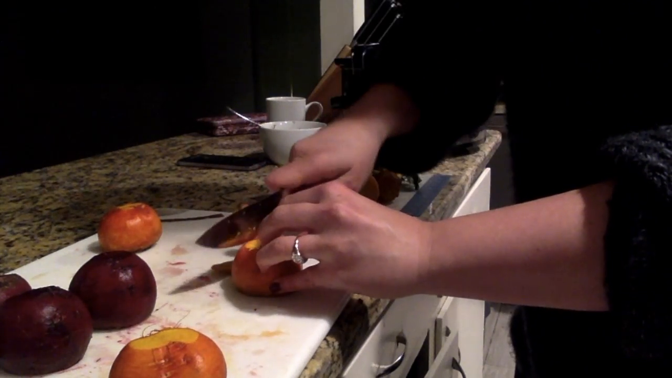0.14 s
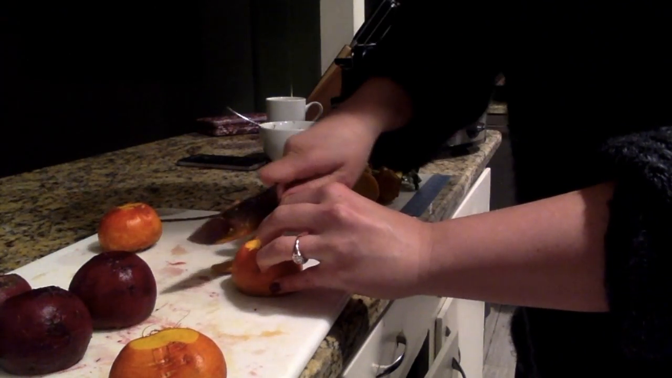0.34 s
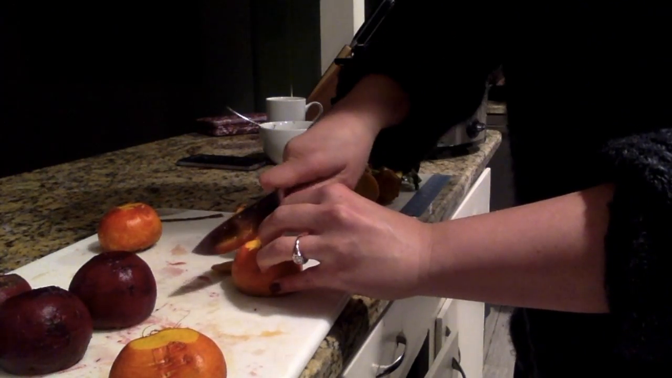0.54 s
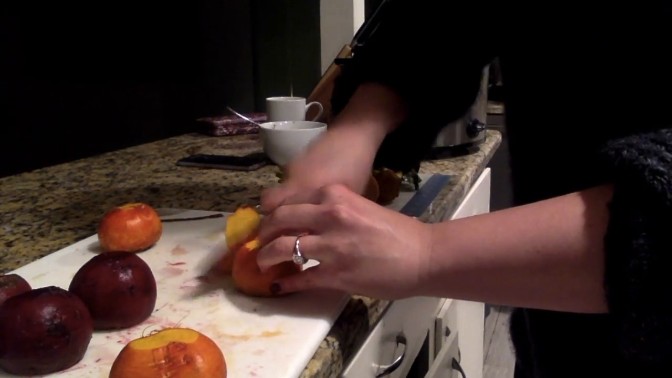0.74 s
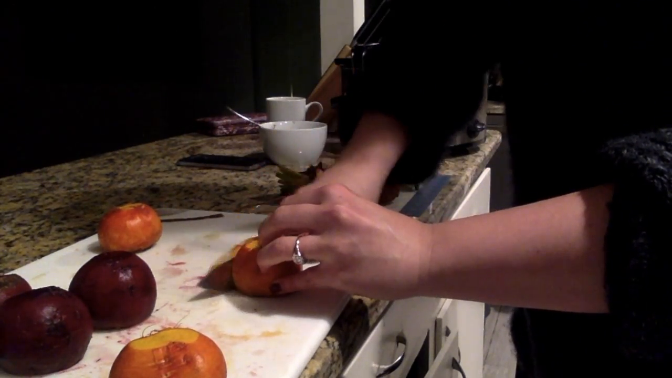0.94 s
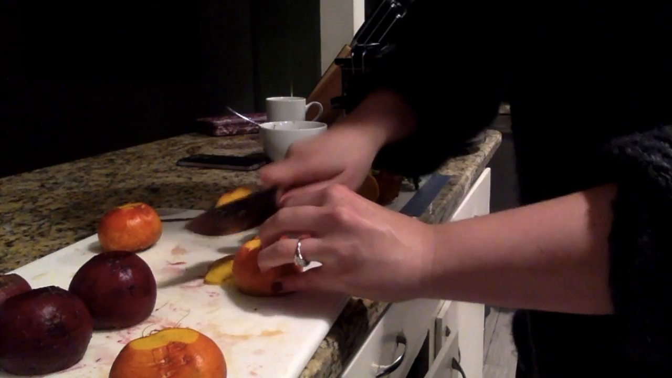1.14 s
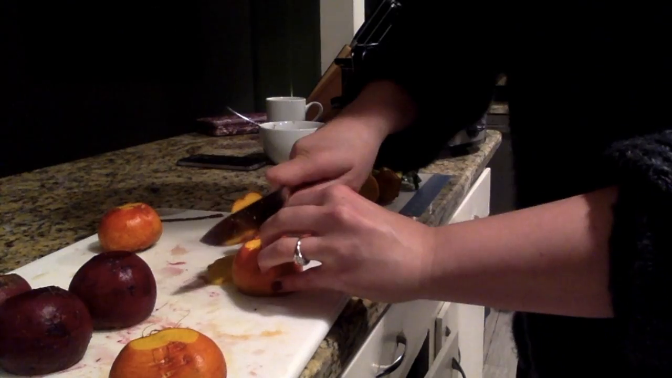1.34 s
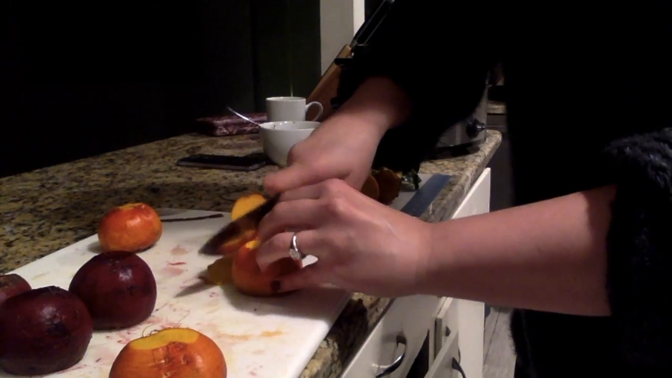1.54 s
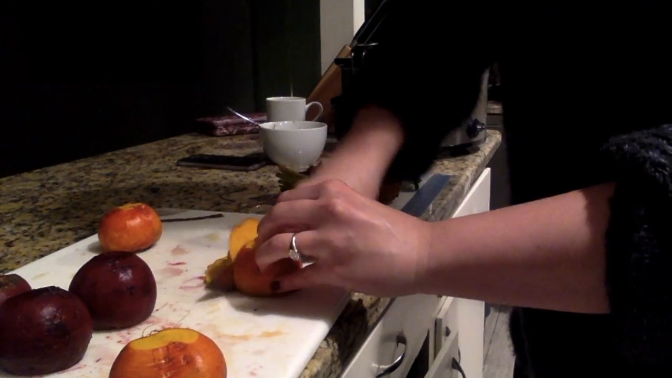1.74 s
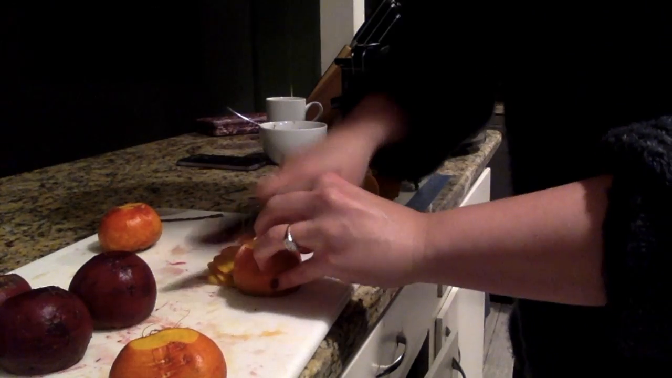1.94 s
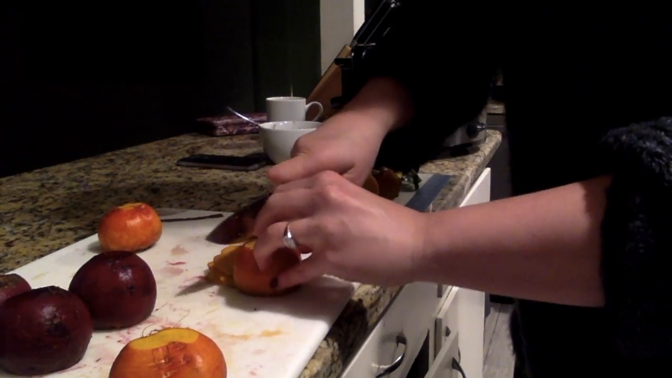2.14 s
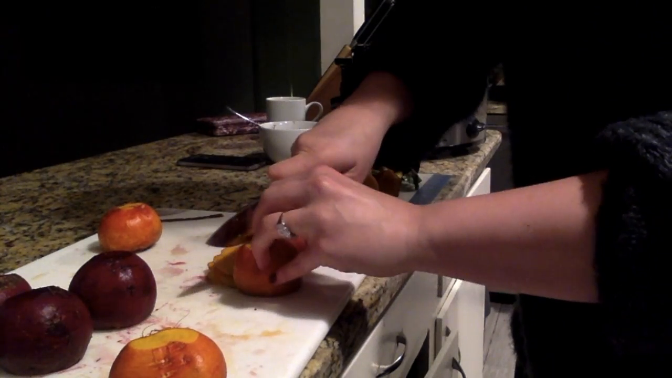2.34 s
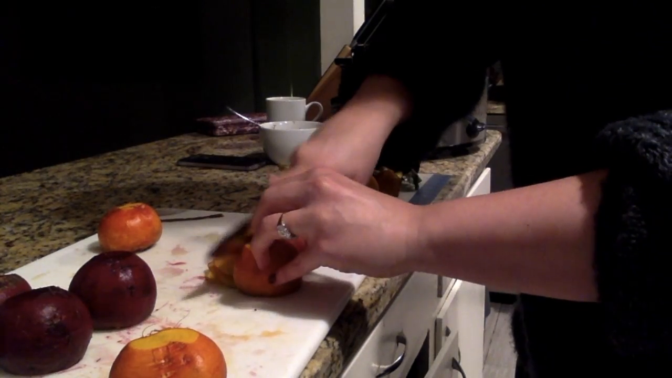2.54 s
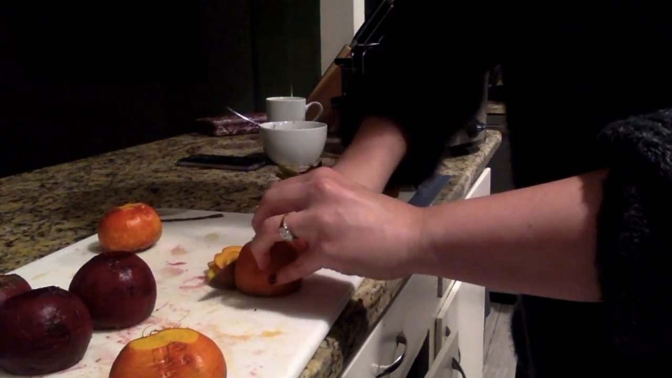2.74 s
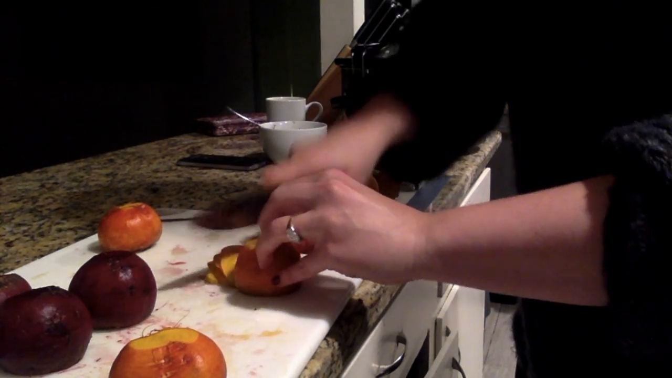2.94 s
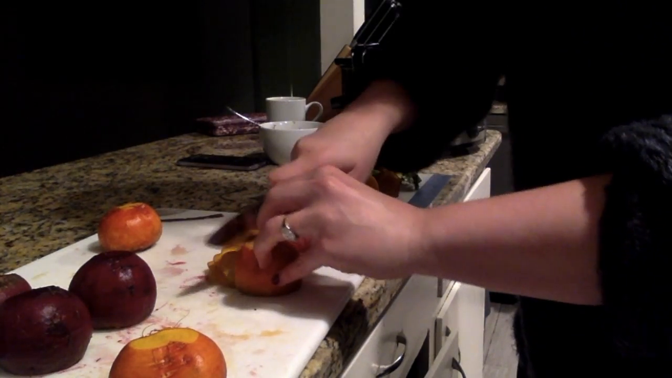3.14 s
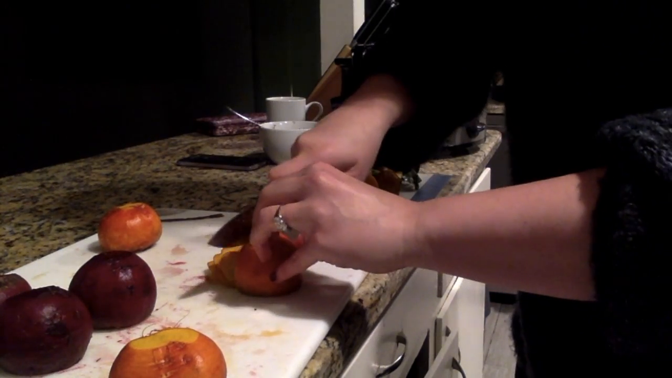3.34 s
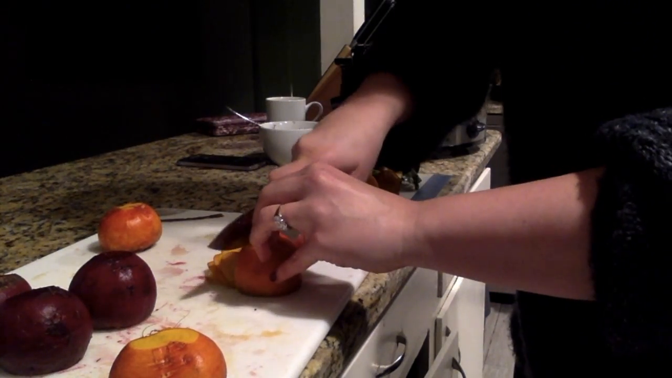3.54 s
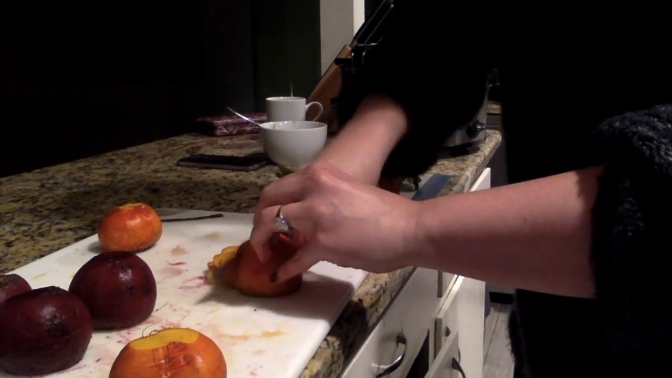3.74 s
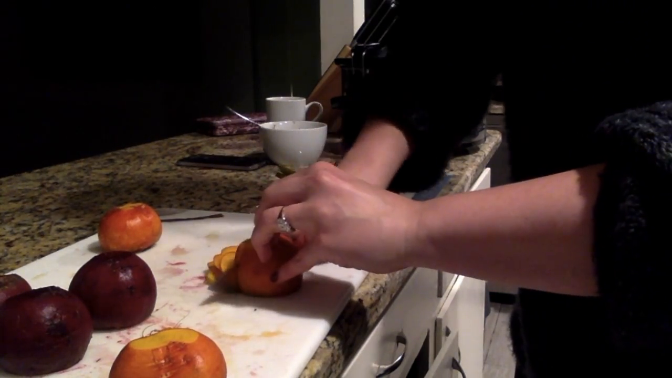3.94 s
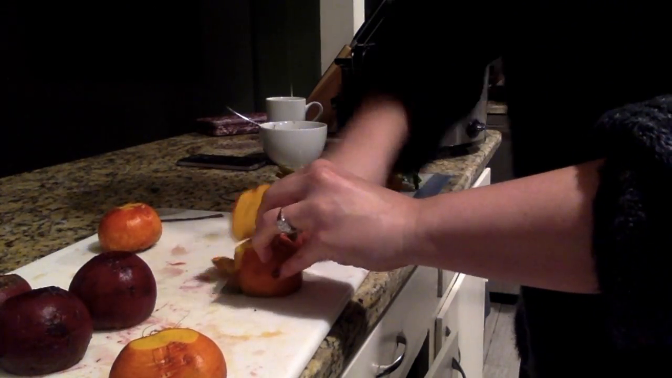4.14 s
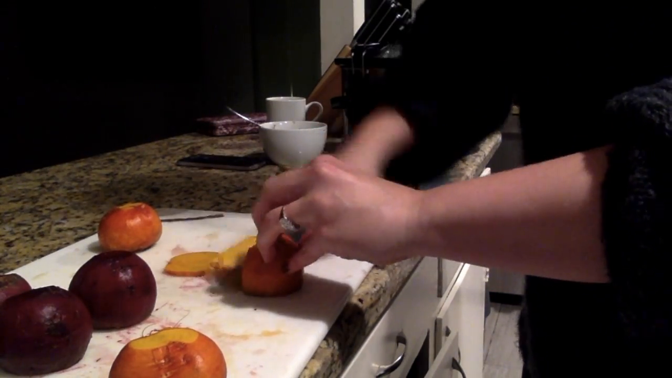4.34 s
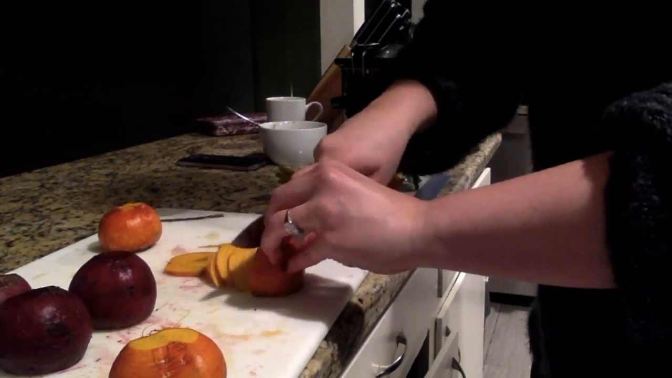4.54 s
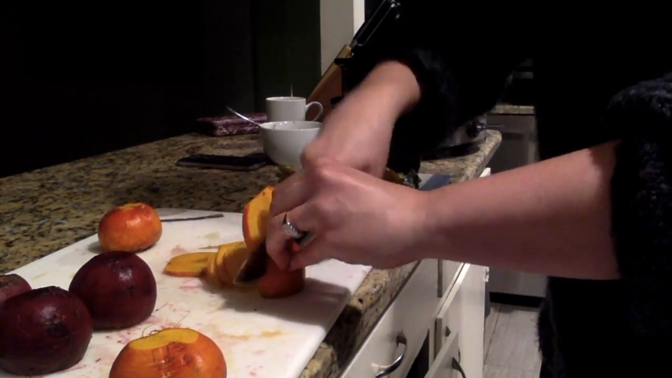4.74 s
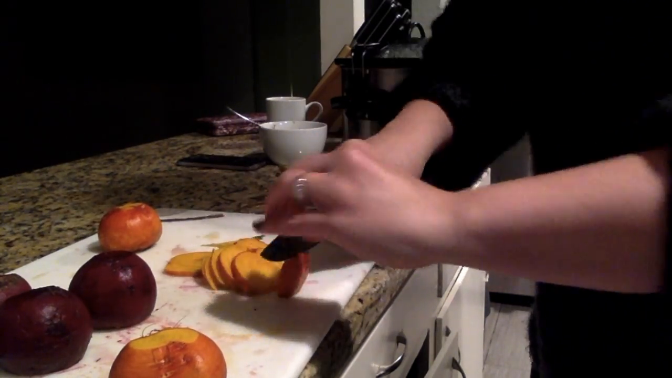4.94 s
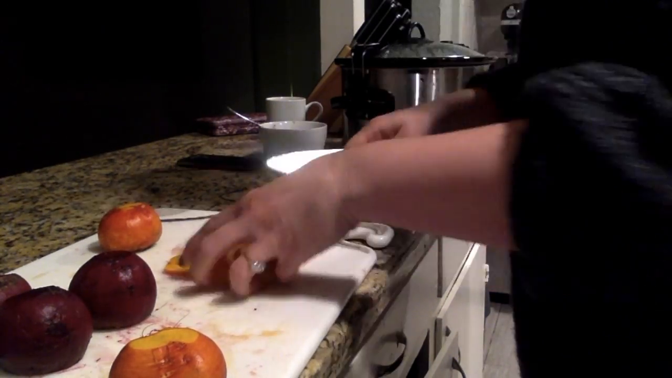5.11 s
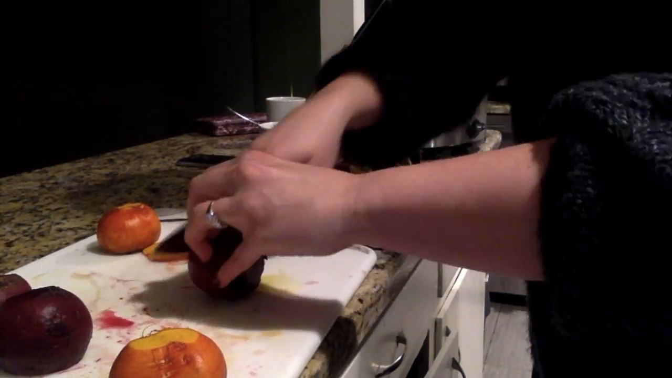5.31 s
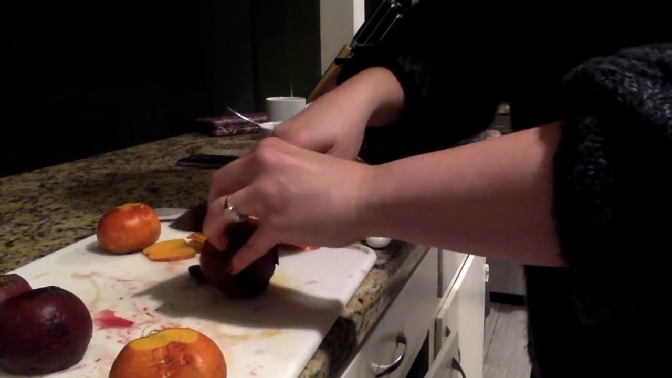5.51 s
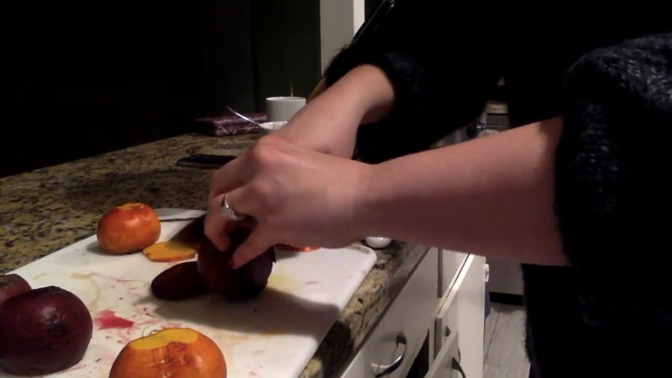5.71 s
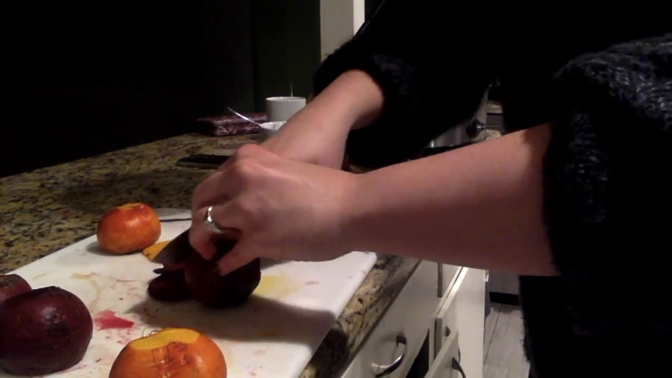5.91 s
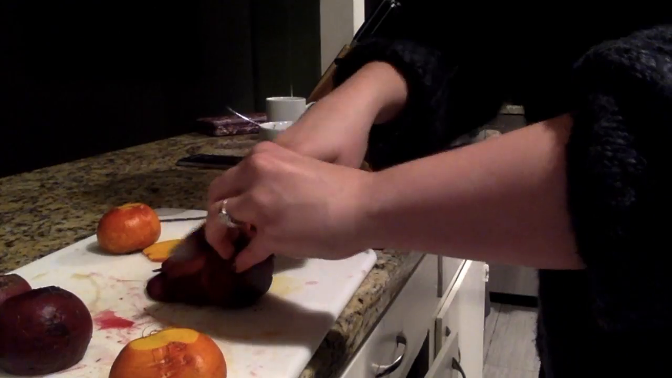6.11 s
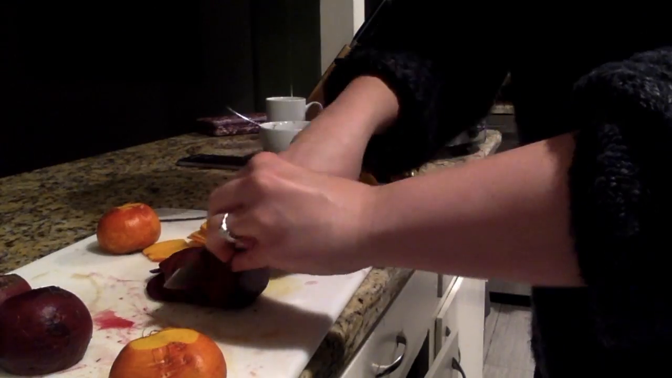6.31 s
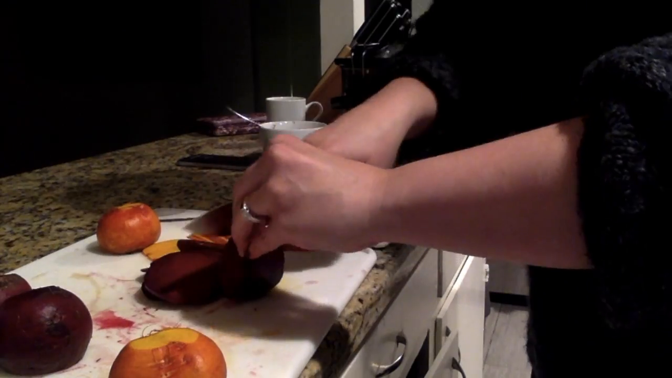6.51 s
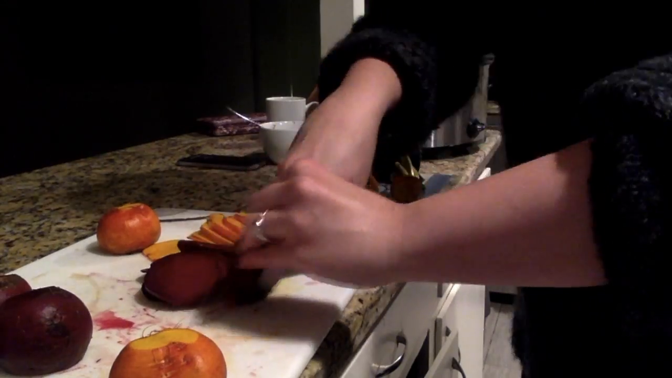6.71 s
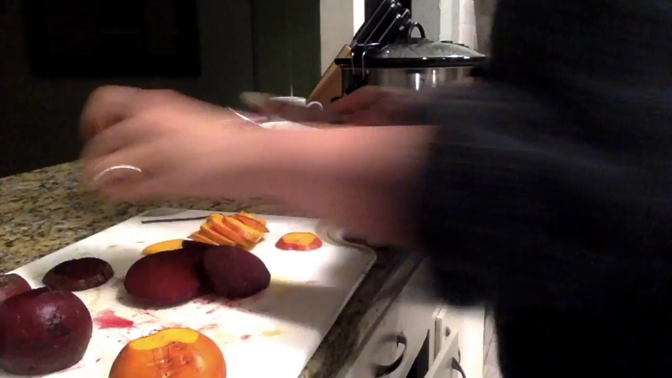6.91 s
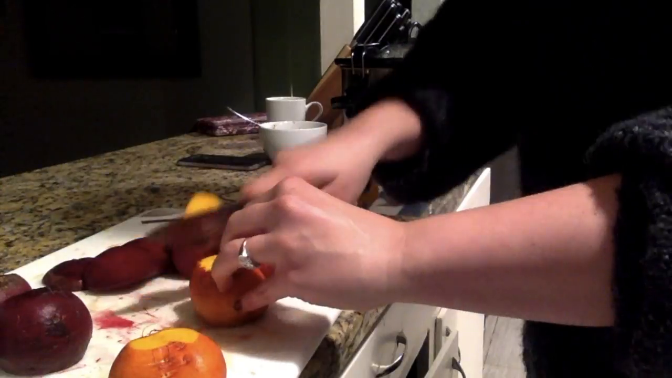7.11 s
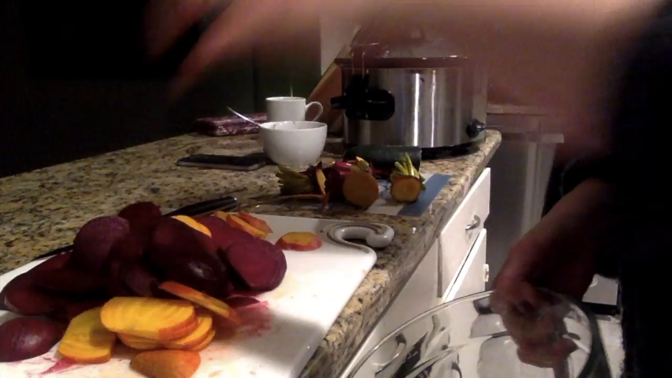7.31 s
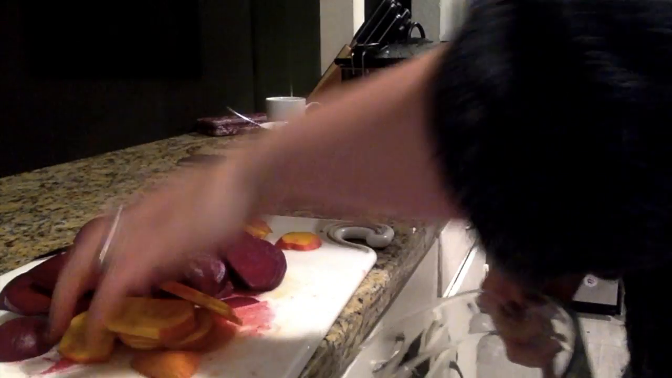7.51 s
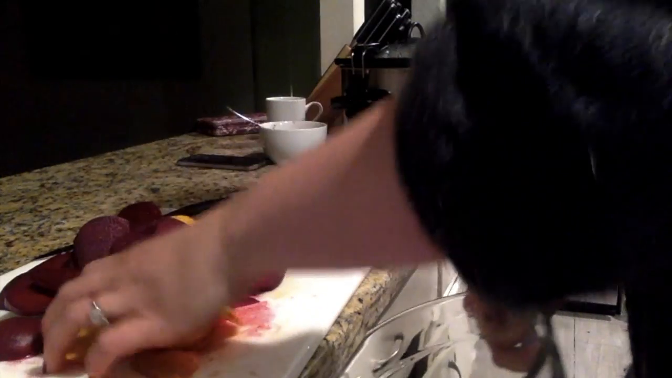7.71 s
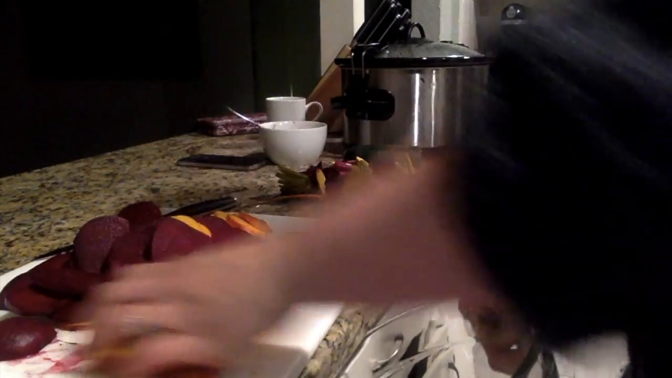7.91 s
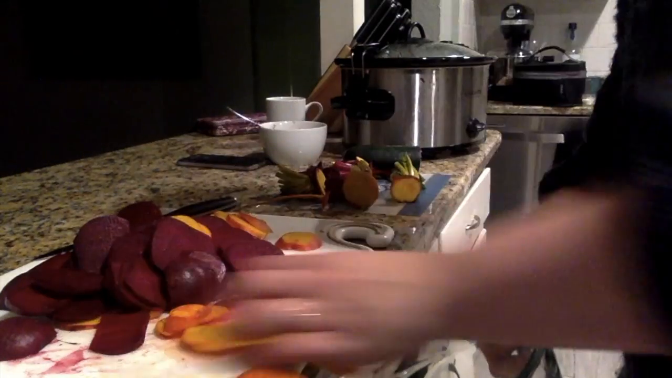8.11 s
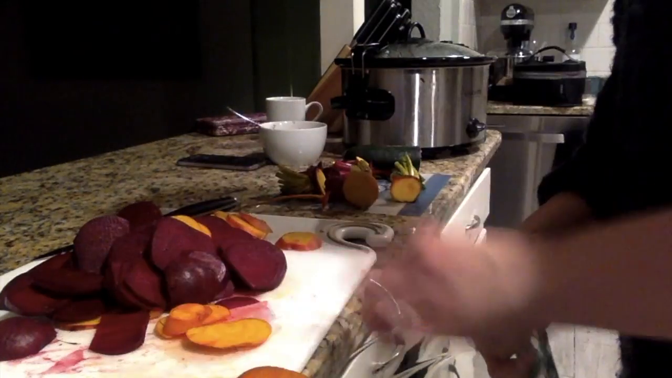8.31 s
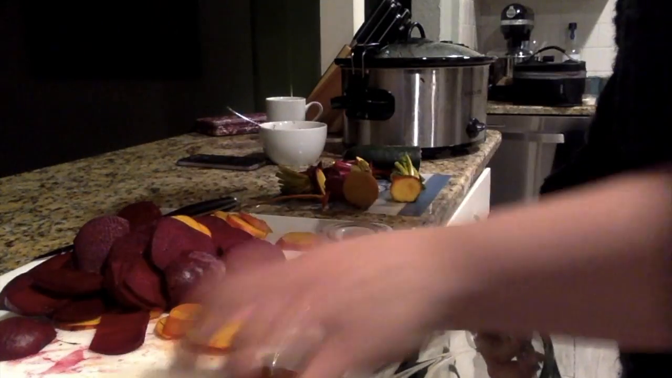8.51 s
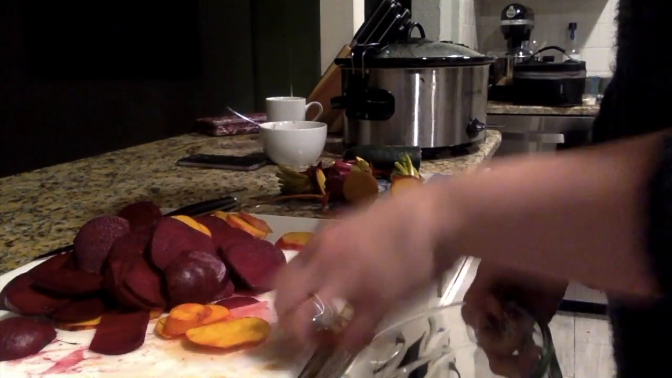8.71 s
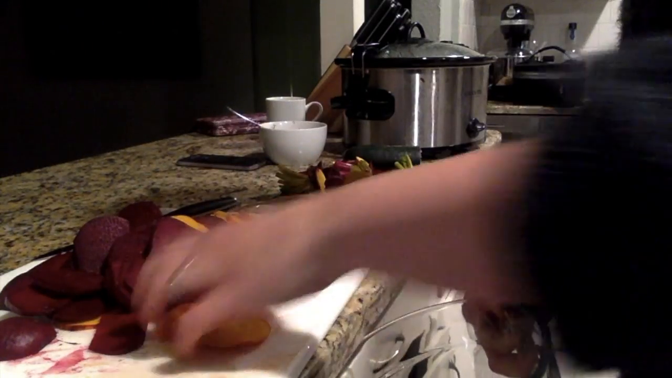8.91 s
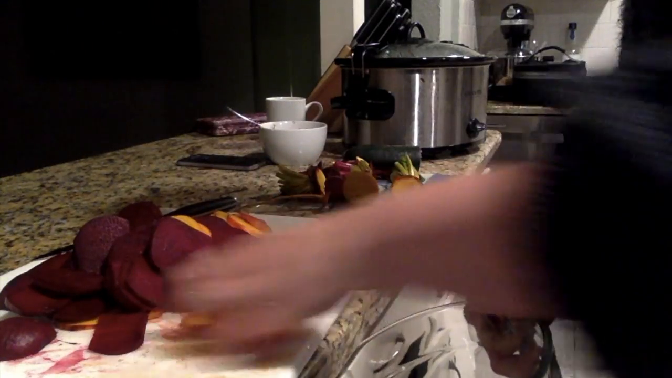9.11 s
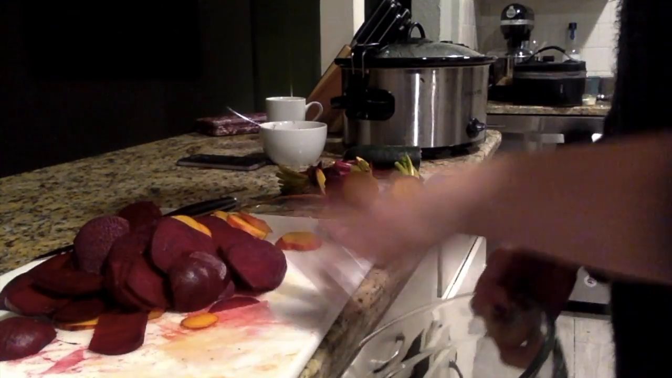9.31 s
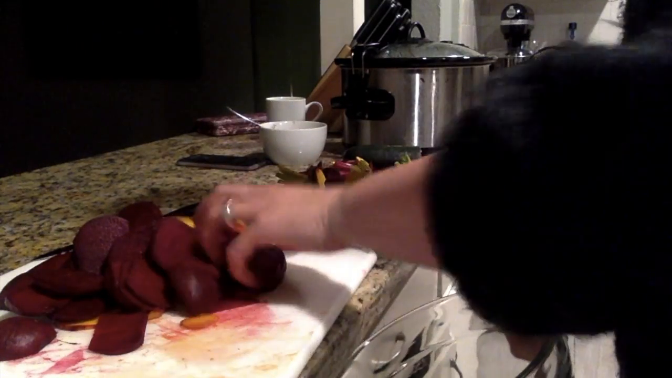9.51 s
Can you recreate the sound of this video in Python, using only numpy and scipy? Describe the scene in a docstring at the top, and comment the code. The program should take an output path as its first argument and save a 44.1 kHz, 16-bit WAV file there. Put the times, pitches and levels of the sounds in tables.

```python
"""A knife slices raw beets on a plastic board on a stone counter: rupturing cells crunch, then the
blade's impact excites the board's damped modes. The middle stretch runs in fast motion, where time
compression raises every frequency: knocks become bright ticks, the refrigerator's hum a thin whine.
After a short silence, at normal speed, slices thud on the board and into a glass bowl and are pushed
about by hand with wet friction. The kitchen adds reflections and reverberation."""
import sys
import numpy as np
from scipy import signal
from scipy.fft import rfft, irfft, next_fast_len
from scipy.io import wavfile
from scipy.ndimage import map_coordinates

SR = 44100
rng = np.random.default_rng(int(sys.argv[2]) if len(sys.argv) > 2 else 0)


def put_to_file(sound):
    """Save the sound as 16-bit audio at rate SR, in the file named by the first command-line argument."""
    columns = np.atleast_2d(sound).T  # one column per channel
    safe = np.clip(columns, -1, 1)
    whole_steps = np.round(safe * 32767)
    wavfile.write(sys.argv[1], SR, whole_steps.astype(np.int16))


N = 421155
TIME = np.arange(N) / SR
SPEED = 13.65  # time compression in fast motion

# blade impacts: t/s, level/dB, thump/dB, hardness/dB
BLADE_IMPACTS = [(0.7841, -16, 0.5, -2), (1.689, -19, -2.5, -5), (2.6228, -1.5, 9, 13.5),
                 (3.826, -17, -0.5, -8)]
# spectral envelope of an impact: f/Hz, level/dB
KNOCK_SPECTRUM = [(30, -53), (110, -40.5), (220, -42.5), (400, -31.5), (570, -28.5), (800, -12.5),
                  (1000, -7.5), (1250, 0), (1750, -7.5), (2150, -24), (2600, -13), (2950, -22),
                  (3550, -16.5), (4400, -29), (5600, -35), (7500, -51), (16000, -51)]
# modes of the board with the blade pressed on it: f/Hz, level/dB, T60/s
BOARD_MODES = [(794, -5, .3), (926, -2, .3), (933, -4.5, 0.13), (1128, -1, 0.23), (1163, -3.5, .25),
               (1170, -6, 0.14), (1250, -3.5, 0.44), (1299, -4, 0.64), (1424, -7, 0.39), (1560, -6, 0.21),
               (1598, -9, 0.64), (1740, -15.5, .35), (2407, -13.5, .3), (2686, -15, 0.49),
               (3120, -15.5, 0.24), (3340, -17.5, 0.23), (3290, -12.5, 0.29), (3760, -16, .42),
               (4235, -18, .4)]
# modes of the counter beneath: f/Hz, level/dB, T60/s
COUNTER_MODES = [(68, -1.5, 0.16), (98.46, -2, 0.14), (120, -5, .13), (308, 0, 0.2)]
def chopping():
    """Impact excitation: the blade sets the board ringing; a heavy blow also moves the counter."""
    out = np.zeros(N)
    for s, db, thump_db, hard_db in BLADE_IMPACTS:
        contact = impulse_response(0.97, direct_db=-5.5, scatter_db=-1.5, scatter_t60=.12, room_db=-3)
        body = unit_attack(colour(contact, lambda hz: along(KNOCK_SPECTRUM, hz)))
        knock = body + amp(-12) * unit_attack(ring(BOARD_MODES, len(body)))
        knock = colour(knock, lambda hz: shelves(hz, thump_db, hard_db, low_hz=484, high_hz=2710))
        thump = amp(3 * thump_db - 56.5) * unit_attack(ring(COUNTER_MODES, len(body)))
        add(out, s, amp(db) * (unit_attack(knock) + thump))
    return out


# strokes: skin t/s, bite time/s, flesh t/s, sinking time/s, relative rasp/dB, tear/dB, fizz/dB
STROKES = [(0.578, 0.036, 0.63, 0.15, -54.5, -46, -38), (1.415, 0.19, 1.54, 0.11, -57, -45.5, -38.5),
           (2.455, 0.11, 2.462, .15, -47.5, -43, -35.5), (3.495, 0.028, 3.59, 0.06, -59, -45, -44)]
# spectral envelopes of rasping skin, tearing flesh and fizzing juice: f/Hz, level/dB
RASP_SPECTRUM = [(900, -32), (1800, -14), (2400, 0.5), (2750, -5), (3200, -15), (4500, -21), (7000, -35.5),
                 (12000, -51)]
TEAR_SPECTRUM = [(290, -52), (500, -21.5), (666, -19.5), (795, 1), (1020, -13), (1120, -3.5), (1490, -5.5),
                 (1610, -4.5), (1880, -2.5), (2560, 2), (2930, -4.5), (5930, -14.5), (7000, -26),
                 (9100, -53.5), (15400, -120)]
FIZZ_SPECTRUM = [(3000, -33), (5500, 0), (7500, -6.5), (10000, 2), (16000, -0.5)]
def cutting():
    """Fracture noise: the edge rasps through the skin; with depth, more cells tear and spit juice."""
    release_db_per_s = 329.5
    rasp = crackle(RASP_SPECTRUM, spiky_db=4.5, room_db=3.5)
    tear = crackle(TEAR_SPECTRUM, spiky_db=7, room_db=0.5)
    fizz = crackle(FIZZ_SPECTRUM, spiky_db=6, room_db=-5.5)
    out = np.zeros(N)
    for stroke, (knock_s, *_) in zip(STROKES, BLADE_IMPACTS):
        skin_s, bite_s, flesh_s, sink_s, rasp_db, tear_db, fizz_db = stroke
        bite = np.clip((TIME - skin_s) / bite_s, 0, 1)
        depth = np.clip((TIME - flesh_s) / sink_s, 0, 1)
        skin = amp(rasp_db) * bite * np.sqrt(1 - depth ** 2) * rasp
        flesh = amp(tear_db) * depth ** 0.8 * tear
        juice = amp(fizz_db - 3) * depth ** 2.1 * fizz
        juice *= 1 + np.exp(-((TIME - knock_s + 0.0096) / 0.004) ** 2)  # the last skin snaps
        release = amp(-release_db_per_s * np.maximum(TIME - knock_s, 0))
        out += (skin + flesh + juice) * release
    return out * amp(1.1 * wobble(knots_per_s=90))  # the fibres give way unevenly


# cuts in fast motion: t/s, relative level/dB, thump/dB, relative crunch/dB
QUICK_CUTS = [(4.174, -22, -8.5, -46), (4.2825, -13.5, 4, -61), (4.3439, -37, -3, -60),
              (4.369, -46, -8, -65), (4.439, -16, -2.5, -56), (4.5102, -17, -2, -58),
              (4.5879, -47.5, 0, -66), (4.633, -15, 6, -62), (4.78, -28, 0, -57),
              (4.7947, -34.5, -2.5, -69.5), (5.0457, -31.5, -2, -65), (5.138, -47, -7, -85),
              (5.202, -41.5, 2, -53.5), (5.3677, -6, -5.5, -66), (5.4888, -9.5, -4.5, -61),
              (5.5568, -12.5, -1, -62), (5.6474, -8, -3.5, -59), (5.752, -9, 3.5, -55),
              (5.8308, -8, -1.5, -55), (5.9497, -9, -1.5, -57), (6.0465, -12.5, -0.5, -52),
              (6.1993, -7.5, 2.5, -57), (6.367, -10, 0, -69), (6.6866, -47.5, 2.5, -85),
              (6.7434, -15.5, 1.5, -78), (6.775, -7.5, -3.5, -66), (6.8504, -41.5, -3, -51.5),
              (6.8748, -40, 1, -64), (6.9175, -35.5, -8, -85), (6.9726, -48.5, -1, -80),
              (7.05, -9.5, 0, -73), (7.1088, -7.5, -3.5, -56), (7.1631, -10, -4, -58)]
def quick_chopping():
    """Time compression: each cut shrinks to a faint touch of the blade, a brief crunch and a tick."""
    out = np.zeros(N)
    lead = np.arange(-SR // 50, 0) / SR
    for s, db, thump_db, crunch_db in QUICK_CUTS:
        touch_s = s - rng.uniform(0.011, 0.028)
        add(out, touch_s, amp(db - 47) * quick_knock(thump_db=5.5))
        crunch = rng.standard_normal(len(lead)) * amp(1370 * lead)  # swells up to the knock
        add(out, s + lead[0], amp(crunch_db + 4.5) * crunch)
        add(out, s, amp(db) * quick_knock(thump_db))
    return out


# spectral envelope of a quick knock before time compression: f/Hz, level/dB
QUICK_KNOCK_SPECTRUM = [(5, -15.5), (40, -11.5), (160, -11.5), (300, -12), (470, -11), (590, -13),
                        (690, -10.5), (790, -4), (850, -10), (915, -0.5), (1020, -11.5), (1100, 3),
                        (1150, -2.5), (1200, -13.5), (1260, -44.5)]
def quick_knock(thump_db):
    """Time-frequency scaling: a knock's frequencies are multiplied and its times divided by SPEED."""
    def gain_db(hz):
        thump = shelves(hz / SPEED, thump_db, 0, low_hz=543, high_hz=2100)
        return along(QUICK_KNOCK_SPECTRUM, hz / SPEED) + thump
    contact = impulse_response(SPEED, direct_db=0.5, scatter_db=2.5, scatter_t60=0.14, room_db=6)
    return amp(-2.5) * unit_attack(colour(contact, gain_db), SPEED)


# slices and hands landing: t/s, level/dB, cavity f/Hz, bass/dB, wet slap/dB, glass ring/dB
LANDINGS = [(7.284, -59.5, 3090, -17, 19, -26), (7.594, -29, 484, -5, -9.5, -16.5),
            (7.696, -28.5, 336, -3.5, -6.5, -15.5), (8.161, -66, 2630, 0, 17, -37),
            (8.194, -59, 2500, 0, 22, -30), (8.225, -57.5, 12700, -12, 30, -34),
            (8.253, -32.5, 490, 4, 10, -19), (8.267, -41, 12400, -8, 29, -33),
            (8.296, -40.5, 155, 14, 15, -24), (8.328, -42, 170, 3, 13.5, -39),
            (8.411, -55, 3540, 6, 5, -34), (8.856, -44, 178.4, 4, 3, -4.5),
            (8.878, -42, 158, 12, 19.5, -14), (9.284, -45, 437, -7, -1, -29),
            (9.299, -41, 1400, -17, 35, -37)]
# spectral envelope of a soft impact: f/Hz, level/dB
THUD_SPECTRUM = [(30, -33), (90, -13), (170, -6.5), (300, -5), (480, -5.5), (900, -4), (1100, -11),
                 (1450, -3), (1900, -20), (3500, -27.5), (7000, -38.5), (10000, -39.5), (16000, -34.5)]
# modes of the glass bowl: f/Hz, level/dB, T60/s
BOWL_MODES = [(626, -0.5, 0.26), (1440, -3.5, 0.43), (1500, -0.5, 0.43), (2600, -1.5, 0.11),
              (2670, -5.5, 0.27), (3870, -12, 0.15), (4160, -16, 0.16), (4240, -1, 0.049), (9060, -6, 0.12)]
def dropping():
    """Soft impact and cavity resonance: slices trap air as they land, and the glass bowl rings."""
    out = np.zeros(N)
    for s, db, cavity_hz, bass_db, slap_db, glass_db in LANDINGS:
        def gain_db(hz):
            cavity = 13 * np.exp(-(np.log((hz + 1) / cavity_hz) / 0.22) ** 2)
            tilt = shelves(hz, bass_db, slap_db, low_hz=194, high_hz=1650)
            return along(THUD_SPECTRUM, hz) + cavity + tilt
        contact = impulse_response(0.96, direct_db=3, scatter_db=9.5, scatter_t60=0.095, room_db=1.5)
        thud = unit_attack(colour(contact, gain_db))
        glass = amp(glass_db) * unit_attack(ring(BOWL_MODES, len(thud)))
        add(out, s, amp(db) * (thud + glass))
    return out


# pushes over the board: peak t/s, rise/s, fall/s, rub/dB, squelch/dB
PUSHES = [(7.96, 0.28, 0.34, -67, -73.5), (8.03, 0.06, 0.033, -75, -62), (8.35, 0.056, 0.095, -46.5, -81),
          (8.535, 0.023, 0.19, -55.5, -90), (8.67, 0.075, 0.056, -52, -76), (9.105, 0.069, 0.088, -42, -62),
          (9.165, 0.075, 0.097, -43.5, -89)]
# spectral envelope of wet friction: f/Hz, level/dB
RUB_SPECTRUM = [(410, -35), (700, -16.5), (885, -21), (1330, -6), (2580, -3.5), (2890, -6), (3840, -13),
                (6010, -32), (7150, -58), (8000, -47), (10400, -77), (17600, -120)]
def sliding():
    """Friction noise: wet slices rub, squeak and squelch, louder the faster they are pushed."""
    swell_db = 18
    rub = unit(crackle(RUB_SPECTRUM, spiky_db=10, room_db=4.5) + amp(-7) * squeaks(count=500))
    squelch = crackle(FIZZ_SPECTRUM, spiky_db=5, room_db=-9)
    out = np.zeros(N)
    for s, rise_s, fall_s, rub_db, squelch_db in PUSHES:
        push = amp(-swell_db * np.maximum((s - TIME) / rise_s, (TIME - s) / fall_s))
        out += push * (amp(rub_db) * rub + amp(squelch_db) * squelch)
    return out


def squeaks(count, centre_hz=2886, t60=0.033):
    """Damped oscillation: air squeezed from between wet slices gives tiny rising chirps; rms 1."""
    out, t = np.zeros(N), np.arange(SR // 20) / SR
    for when, (pitch, size) in zip(rng.random(count), np.clip(rng.standard_normal((count, 2)), -2, 2)):
        hz = centre_hz * np.exp(0.35 * pitch)
        chirp = np.sin(2 * np.pi * hz * t * (1 + 3 * t))
        envelope = amp(2.4 * size - 60 * t / t60) * (1 - np.exp(-t / 0.0014))
        add(out, when * N / SR, chirp * envelope)
    return unit(out + amp(-2.5) * signal.fftconvolve(out, reverberation())[:N])


def crackle(spectrum, spiky_db, room_db):
    """Granular noise: countless tiny ruptures of unequal size add up and reverberate; rms 1."""
    sizes = amp(spiky_db * np.minimum(rng.standard_normal(N // 16 + 1), 2))
    grains = np.repeat(sizes, 16)[:N] * rng.standard_normal(N)
    grains += amp(room_db) * signal.fftconvolve(grains, reverberation())[:N]
    return unit(colour(grains, lambda hz: along(spectrum, hz)))


def ring(modes, size):
    """Modal superposition: damped sinusoids, with new strengths and phases at each strike."""
    t = np.arange(size) / SR
    out = np.zeros(size)
    for hz, db, t60 in modes:
        envelope = amp(db + rng.normal(0, 2.5) - 60 * t / t60)
        out += envelope * np.sin(2 * np.pi * (hz * t + rng.random()))
    return out * (1 - np.exp(-t / 0.0056))


# early reflections off counter and cupboards, at speed 1: delay t/s, level/dB
REFLECTIONS = [(.0021, -9), (.0063, -3.5), (.0088, -9)]
def impulse_response(speed, direct_db, scatter_db, scatter_t60, room_db):
    """Multipath propagation: direct, reflected and scattered sound, all times divided by speed."""
    x = amp(room_db) * reverberation(speed)
    t = np.arange(len(x)) / SR * speed
    scatter = rng.standard_normal(len(x)) * amp(-60 * t / scatter_t60)
    x += amp(scatter_db) * scatter / np.linalg.norm(scatter)
    x *= 1 - np.exp(-t / 0.001)  # the diffuse field needs a moment to build
    for delay, db in [(0.0012, direct_db)] + REFLECTIONS:
        x[round(delay * SR / speed)] += amp(db)
    return x


# reverberation time of the kitchen, at speed 1: f/Hz, T60/s
KITCHEN_T60 = [(60, 0.4), (250, 0.38), (600, .38), (1400, 0.4), (3300, 0.4), (4400, 0.42), (5800, 0.3),
               (8000, 0.17), (16000, 0.1)]
def reverberation(speed=1):
    """Coupled-room decay: the kitchen dies away quickly, the faint rooms beyond slowly; energy 1."""
    hz, t, noise = signal.stft(rng.standard_normal(int(SR / speed)), SR, nperseg=128)
    age = t * speed / along(KITCHEN_T60, hz / speed)[:, None]
    decay = np.hypot(amp(-60 * age), amp(-12 - 33.5 * age))
    x = signal.istft(noise * decay, SR)[1]
    return x / np.linalg.norm(x)


# spectral envelopes of moving air, as heard at normal speed and in fast motion: f/Hz, level/dB
AIR_SPECTRUM = [(15, -46), (45, -11.5), (80, -14.5), (135, -1.5), (210, -8), (270, -11), (360, -6.5),
                (500, -18), (1150, -16), (2000, -27.5), (4500, -32.5), (8000, -36.5), (16000, -35)]
QUICK_AIR_SPECTRUM = [(60, -31), (600, -29.5), (800, -21), (1150, -25.5), (1800, -8), (2200, -15),
                      (2500, -9.5), (2900, -16.5), (4300, -16.5), (4950, -12.5), (5900, -23),
                      (16000, -23.5)]
# refrigerator partials, at speed 1: f/Hz, relative level/dB
HUM_PARTIALS = [(60, -92.5), (120, -84), (184, -77.5), (256, -85.5), (356, -81)]
def room_tone(spectrum, air_db, hum_db, speed=1):
    """Steady background: a continuous spectrum from moving air, a line spectrum from a refrigerator."""
    air = unit(colour(rng.standard_normal(N), lambda hz: along(spectrum, hz)))
    hum = sum(amp(db) * np.sqrt(2) * np.sin(2 * np.pi * (hz * speed * TIME + rng.random()))
              for hz, db in HUM_PARTIALS)
    return amp(air_db) * air + amp(hum_db) * hum


def colour(x, db_of_hz):
    """Minimum-phase filtering: folding the cepstrum makes the gain curve causal."""
    m = 2 * next_fast_len(len(x) // 2 + 2048)
    cepstrum = irfft(np.log(amp(db_of_hz(np.fft.rfftfreq(m, 1 / SR))) + 1e-6))
    cepstrum[1:m // 2] *= 2
    cepstrum[m // 2 + 1:] = 0
    return irfft(rfft(x, m) * np.exp(rfft(cepstrum)), m)[:len(x)]


def shelves(hz, low_db, high_db, low_hz, high_hz):
    """Shelving gain in dB: a heavy blow adds bass, a hard one adds treble."""
    return low_db / (1 + (hz / low_hz) ** 4) + high_db / (1 + (high_hz / (hz + 1)) ** 6)


def along(points, hz):
    """Interpolation of (f/Hz, value) points on a logarithmic frequency axis."""
    f, v = np.transpose(points)
    return np.interp(np.log(hz + 1), np.log(f + 1), v)


def wobble(knots_per_s):
    """Smooth random modulation: a spline through Gaussian knots."""
    return map_coordinates(rng.standard_normal(int(N * knots_per_s / SR) + 4), [TIME * knots_per_s])


def amp(db):
    """Level in dB to amplitude ratio."""
    return 10 ** (np.asarray(db) / 20)


def unit(x):
    """Normalisation to rms 1."""
    return x / np.sqrt(np.mean(x ** 2) + 1e-20)


def unit_attack(x, speed=1):
    """Normalisation of a hit's attack to rms 1."""
    return x / np.sqrt(np.mean(x[:int(.02 * SR / speed)] ** 2))


def add(track, s, sound):
    """Superposition of a sound on a track at time s."""
    part = track[round(s * SR):][:len(sound)]
    part += sound[:len(part)]


def scene():
    """Three stretches in turn: slow cuts, fast motion and, after a silence, gathering the slices."""
    fast_from_s, fast_to_s, resume_s = 4.113, 7.213, 7.281
    slow = cutting() + chopping() + room_tone(AIR_SPECTRUM, air_db=-71, hum_db=2)
    fast = quick_chopping() + room_tone(QUICK_AIR_SPECTRUM, air_db=-75, hum_db=-2.5, speed=SPEED)
    gather = dropping() + sliding() + room_tone(AIR_SPECTRUM, air_db=-68.5, hum_db=5)
    return np.select([TIME < fast_from_s, TIME < fast_to_s, TIME > resume_s], [slow, fast, gather])[None]


def record(dry):
    """Overload and band limiting: the hardest blow clips, and a steep low-pass removes the top treble."""
    cutoff_hz = 16300
    clipped = np.clip(dry, -1, 1)
    hz = np.fft.rfftfreq(2 * N, 1 / SR)
    return irfft(rfft(clipped, 2 * N) / np.sqrt(1 + (hz / cutoff_hz) ** 160))[:, :N]


dry = scene()
out = record(dry)
put_to_file(out)
```